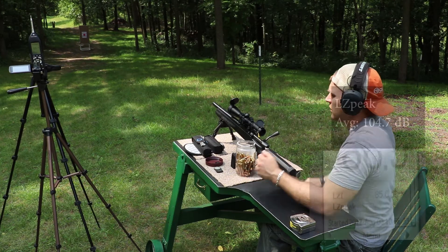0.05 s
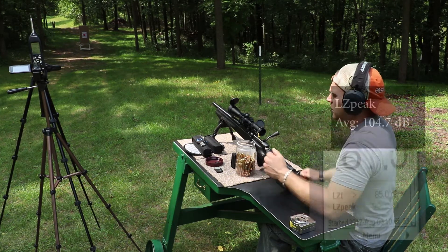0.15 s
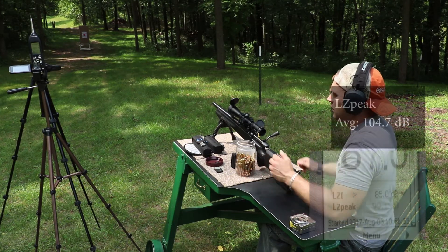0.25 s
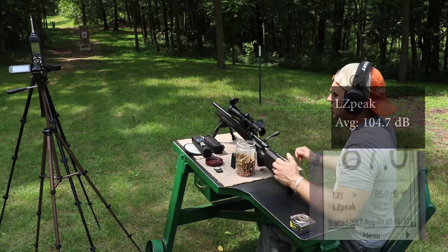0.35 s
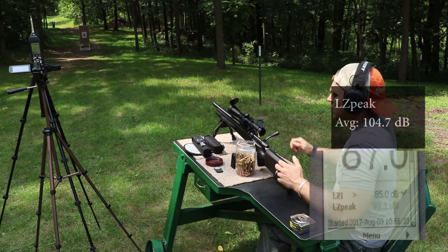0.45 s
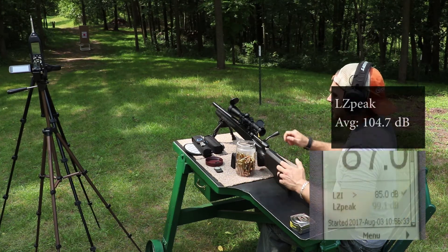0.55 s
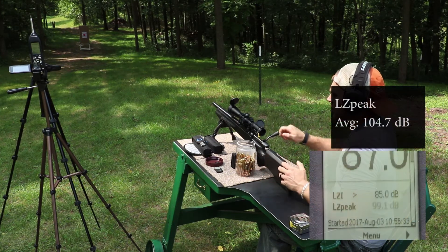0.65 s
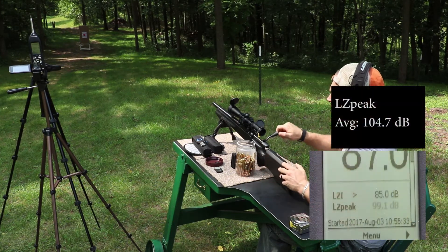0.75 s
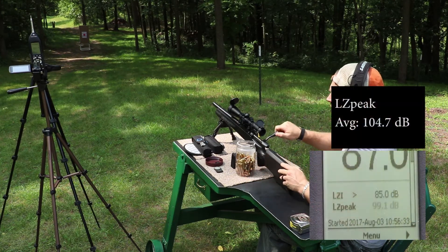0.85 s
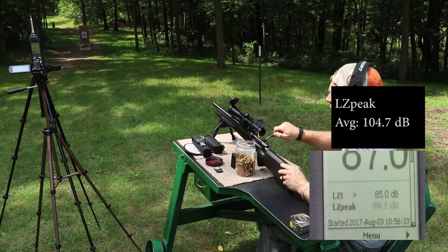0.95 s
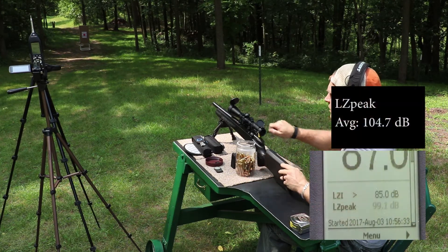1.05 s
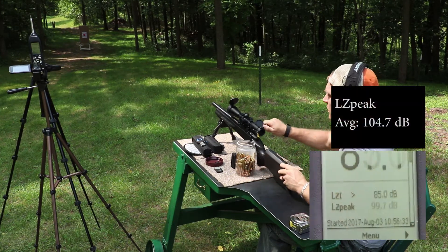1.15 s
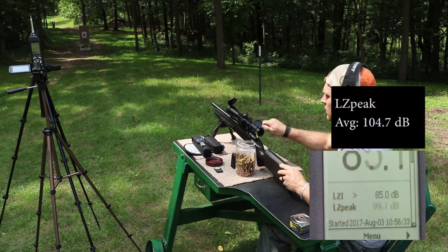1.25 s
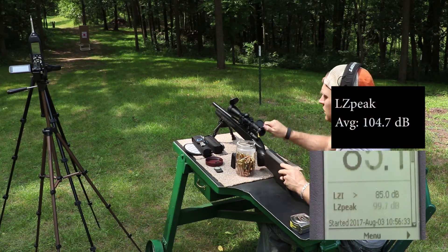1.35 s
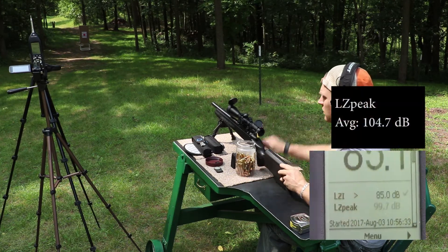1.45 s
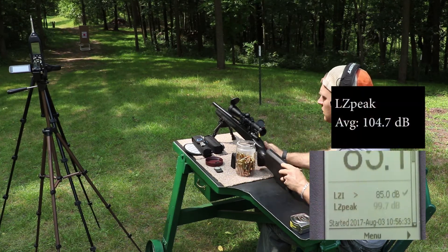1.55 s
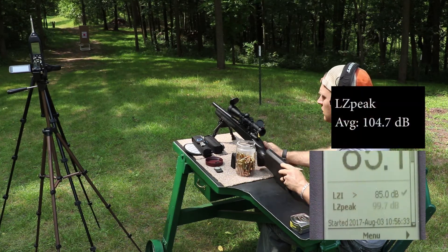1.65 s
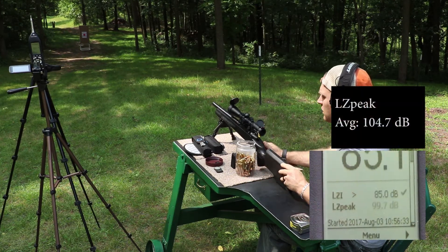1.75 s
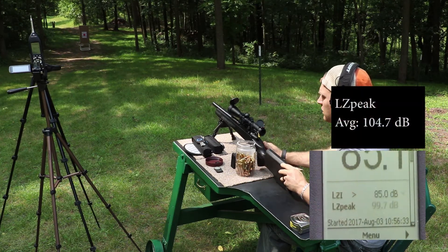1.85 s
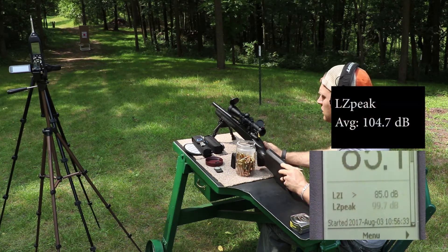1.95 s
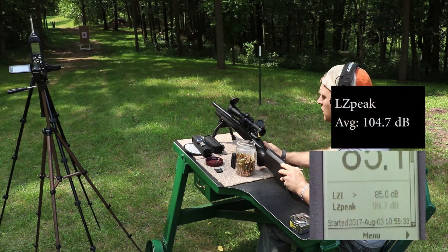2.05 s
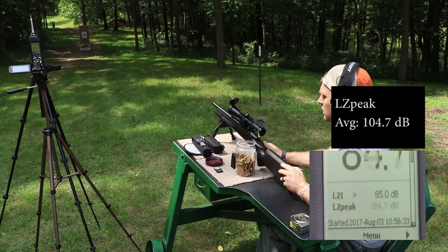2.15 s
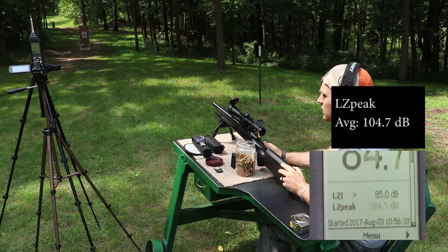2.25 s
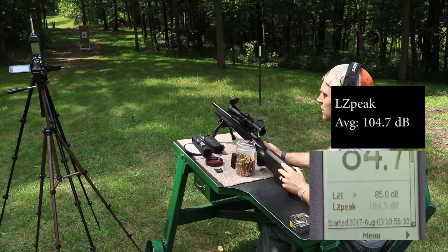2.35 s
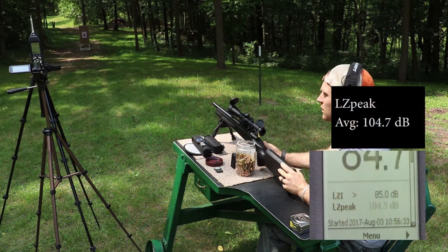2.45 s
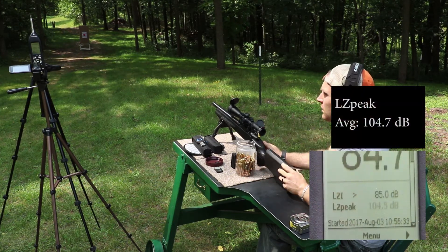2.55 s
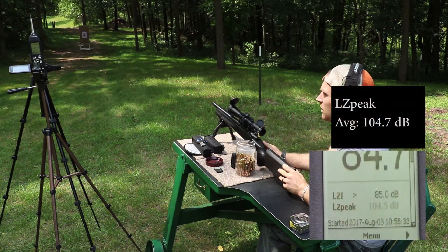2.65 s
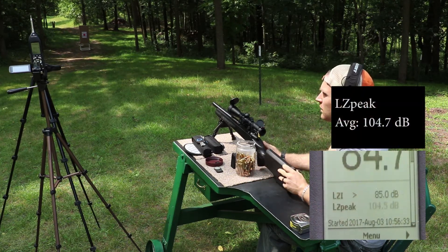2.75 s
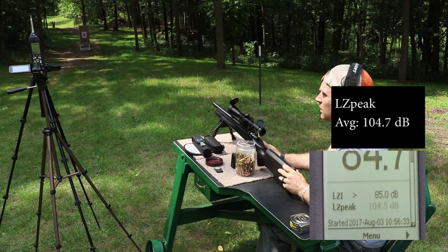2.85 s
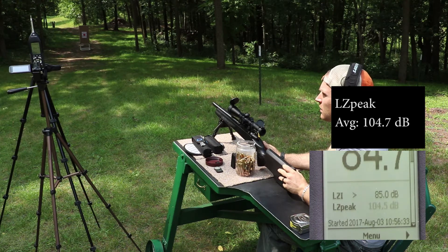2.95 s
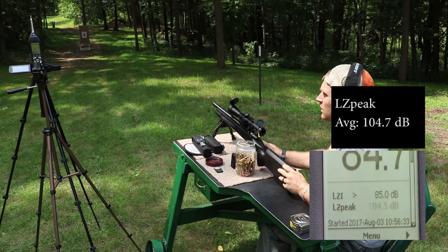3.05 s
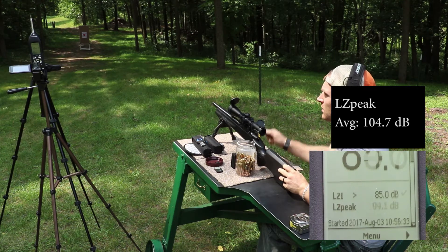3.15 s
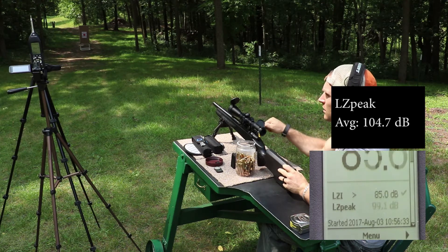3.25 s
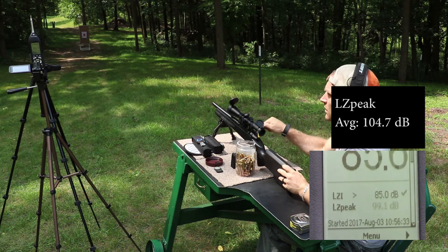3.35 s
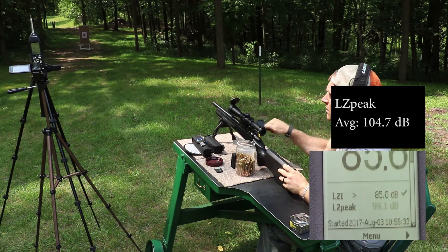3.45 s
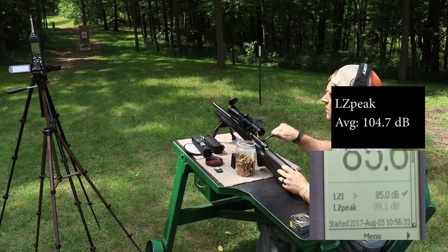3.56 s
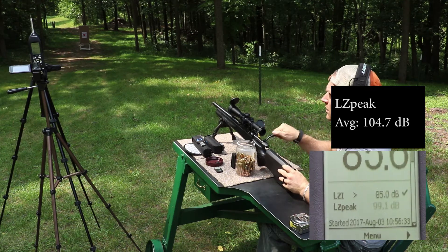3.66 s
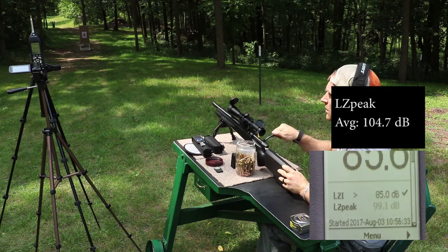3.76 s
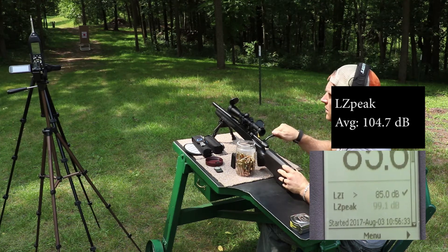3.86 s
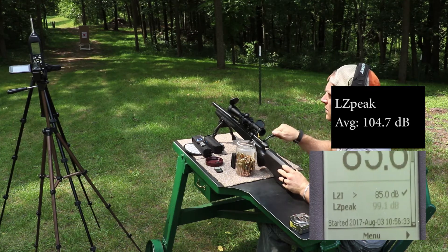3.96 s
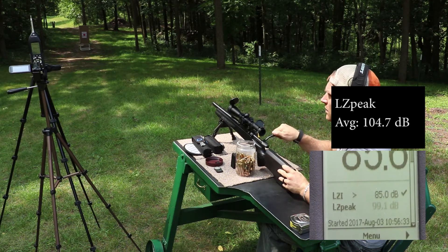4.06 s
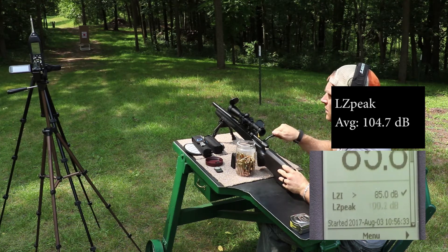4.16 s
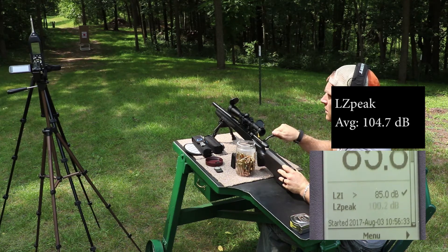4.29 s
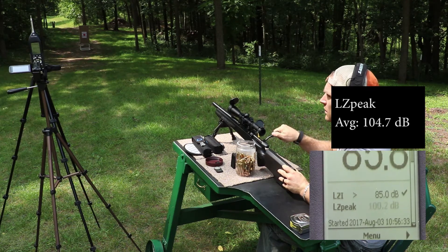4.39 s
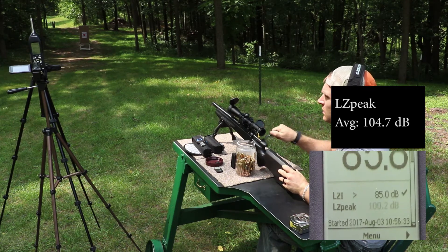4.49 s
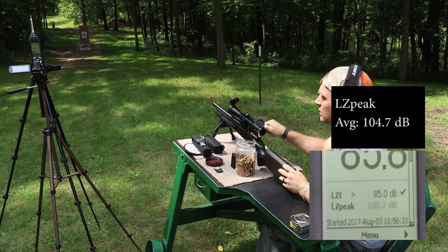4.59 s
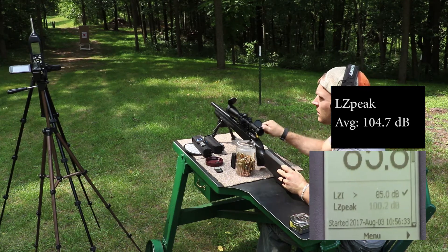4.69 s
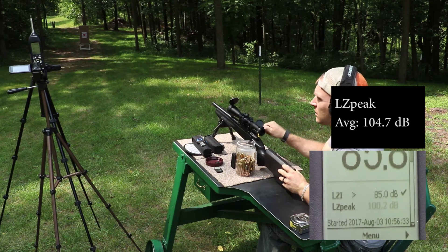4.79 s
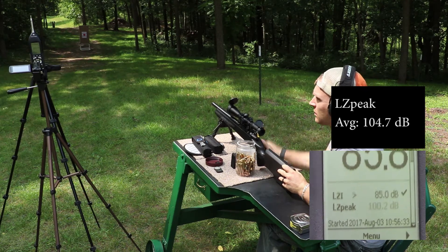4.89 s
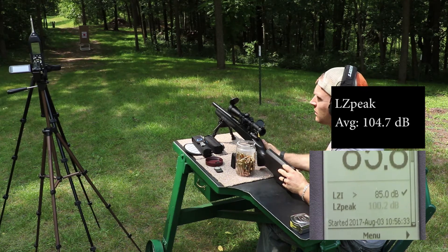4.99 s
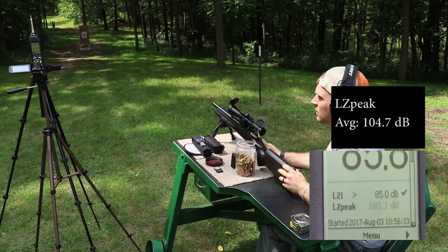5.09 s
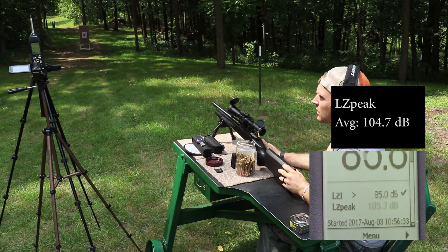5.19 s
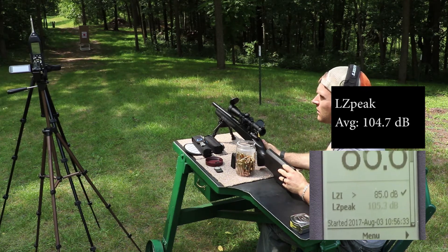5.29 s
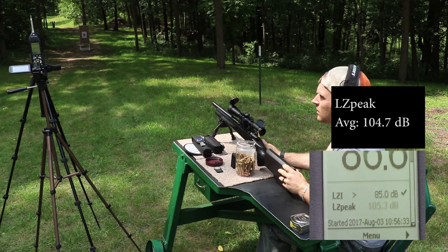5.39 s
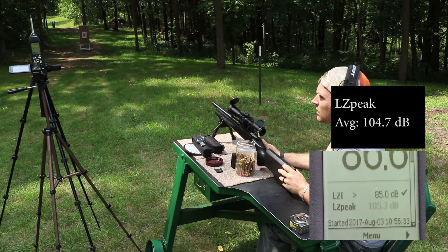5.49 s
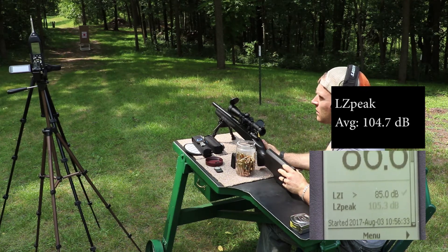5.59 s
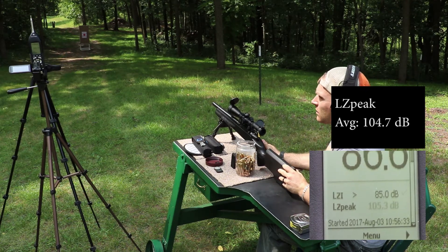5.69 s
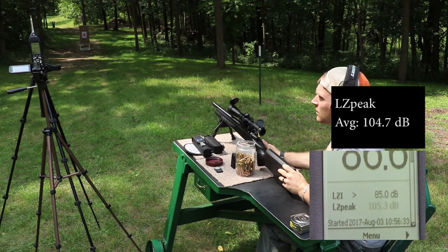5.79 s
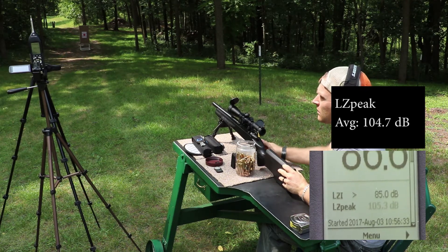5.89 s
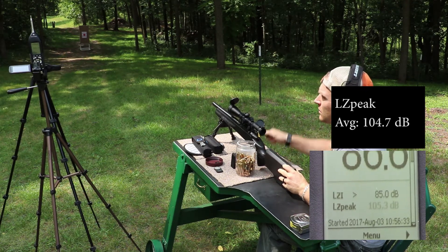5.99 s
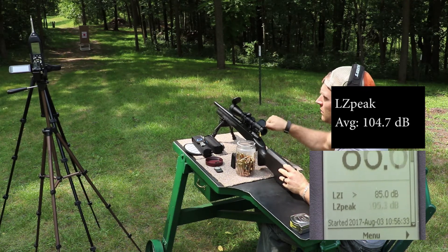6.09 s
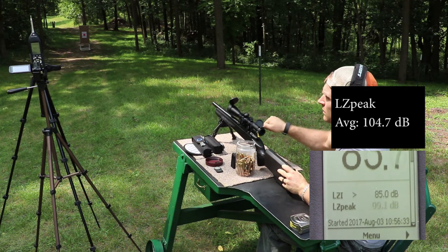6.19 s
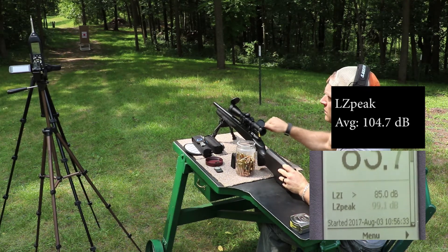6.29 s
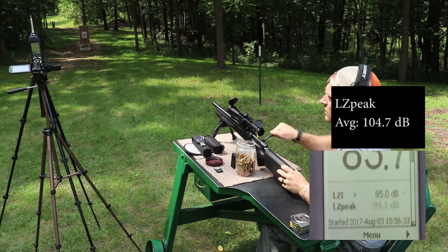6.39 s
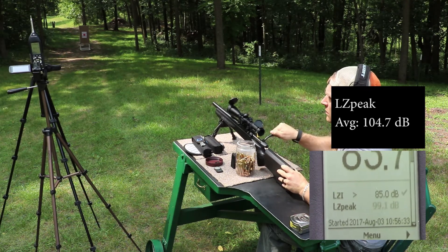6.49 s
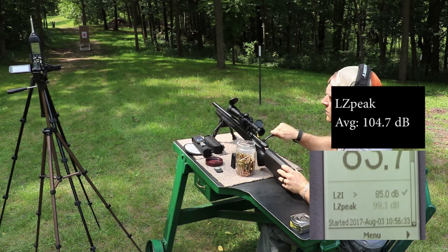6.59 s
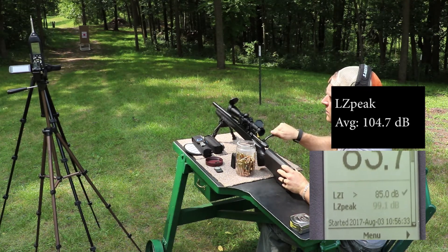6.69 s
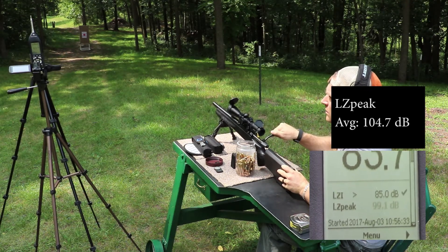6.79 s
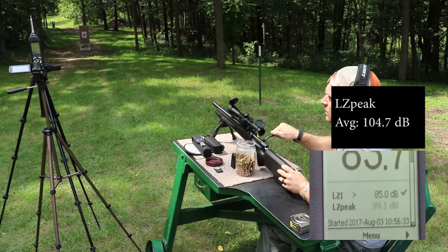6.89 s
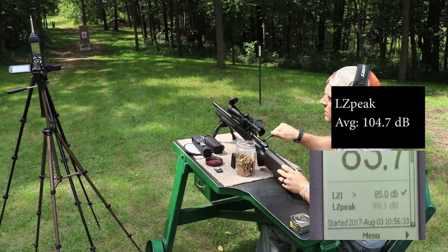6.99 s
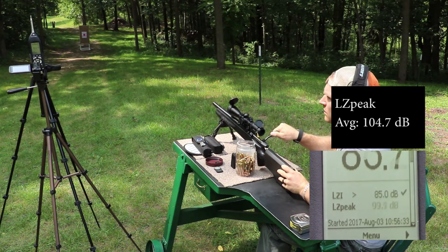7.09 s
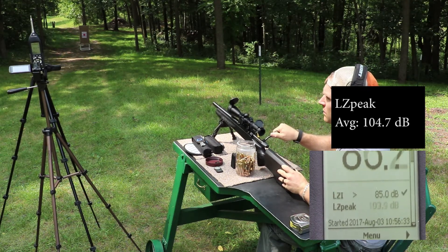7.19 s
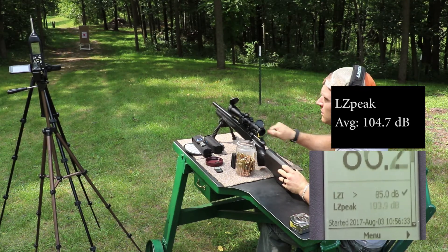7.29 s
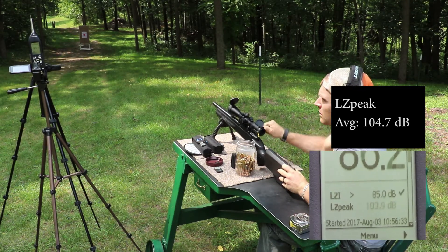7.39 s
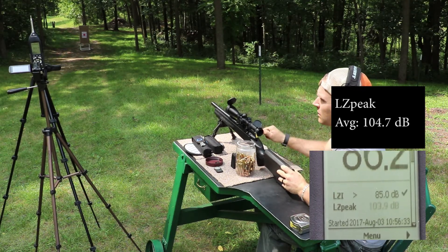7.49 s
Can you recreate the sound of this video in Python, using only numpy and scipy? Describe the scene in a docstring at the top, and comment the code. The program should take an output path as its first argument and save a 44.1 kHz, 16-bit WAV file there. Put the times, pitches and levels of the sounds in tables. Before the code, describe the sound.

Crisp steel clicks, short scrapes and hard clacks of a bolt-action rifle being cycled outdoors, over soft leaf hiss and high insect chirping.

```python
"""Forest clearing: a bolt-action rifle is cycled on a shooting bench while insects chirp in the grass.
The handle lifts, the bolt scrapes back to its stop, is shoved home and is locked down. Contacts are
noise bursts that ring the rifle's modes; slides are rubbing noise with a rising zip of ridges. Trees
scatter each clack into a late wash; breeze and chorus are shaped noise, insect songs are swept tones.
The recorder's limiter ducks on the loud blows, which still clip."""
import sys
import numpy as np
from scipy import signal
from scipy.fft import rfft, irfft, next_fast_len
from scipy.io import wavfile
from scipy.ndimage import uniform_filter1d, map_coordinates

SR = 44100
rng = np.random.default_rng(int(sys.argv[2]) if len(sys.argv) > 2 else 0)


def persist_wave(psi):
    """Save psi, clipped to +-1, as 16-bit WAV."""
    counts = np.round(np.clip(psi, -1, 1) * 32767).astype(np.int16)
    wavfile.write(sys.argv[1], SR, np.atleast_2d(counts).T)


N = 332514  # samples

# In every contact table, treble is the gain of a shelf above about 4 kHz, set before the blow is levelled.
# bolt pulled back against its stop: (time [s], level [dB], chatter [s], treble [dB])
BACK_STOPS = [(3.6157, 24, 0.002, 0), (6.4607, 25.5, 0.0029, 0.5)]
# handle turned down into the stock: (time [s], level [dB], chatter [s], treble [dB])
LOCKINGS = [(1.536, 16, .0013, 3), (4.9631, 15.5, .0011, 3)]


def amp(db):
    """Level to amplitude: 20 dB is a factor of ten."""
    return 10 ** (np.asarray(db) / 20)


def unit(x):
    """Normalization: x at rms 1."""
    return x / np.sqrt(np.mean(x ** 2) + 1e-20)


def along(points, hz):
    """Interpolation of (frequency [Hz], value) points on a logarithmic frequency axis."""
    f, v = np.transpose(points)
    return np.interp(np.log(hz + 1), np.log(f + 1), v)


def wobble(rate, size):
    """Band-limited fluctuation: a smooth random curve with rate knots a second."""
    knots = rng.standard_normal(int(size * rate / SR) + 4)
    return map_coordinates(knots, [np.arange(size) * rate / SR])


def add(track, s, sound):
    """Superposition: mix a sound into the track at time s [s]."""
    part = track[max(0, round(s * SR)):][:len(sound)]
    part += sound[:len(part)]


def filtered(x, response):
    """Linear filtering: the spectrum of x times a response of frequency."""
    n = x.shape[-1]
    padded = next_fast_len(n + SR // 10)
    return irfft(rfft(x, padded) * response(np.fft.rfftfreq(padded, 1 / SR)), padded)[..., :n]


def causal(gain):
    """Minimum phase: folding the cepstrum gives the causal response with this gain."""
    cepstrum = irfft(np.log(np.maximum(gain, 1e-6)))
    half = len(cepstrum) // 2
    cepstrum[1:half] *= 2
    cepstrum[half + 1:] = 0
    return np.exp(rfft(cepstrum))


def rush(spectrum, patchy_db):
    """Partial coherence: patchy stereo noise of rms 1 whose channels differ more in the treble."""
    # likeness of left and right: (frequency [Hz], correlation)
    likeness = [(60, 0.77), (150, 0.76), (380, 0.69), (950, 0.75), (2380, 0.61), (5980, 0.34),
                (15000, 0.06)]
    z = signal.stft(rng.standard_normal((2, N)), nperseg=512)[2]
    patches = uniform_filter1d(rng.standard_normal(z.shape[1:]), size=5, axis=0)  # over frequency
    patches = uniform_filter1d(patches, size=14, axis=1)  # over time
    pair = signal.istft(z * amp(patchy_db * unit(patches)), nperseg=512)[1][:, :N]

    def mid_side(hz):
        angle = np.arccos(np.clip(along(likeness, hz), -1, 1)) / 2
        return amp(along(spectrum, hz)) * [np.cos(angle), np.sin(angle)]

    mid, side = filtered(pair, mid_side)
    return unit(np.array([mid + side, mid - side]))


def breeze():
    """Broadband flow noise: leaves hiss steadily over a low outdoor rumble that swells and sinks."""
    # spectral shape of the air: (frequency [Hz], relative density [dB per Hz])
    leaves = [(20, -10), (45, -1.5), (70, -5), (110, -0.5), (200, -9), (400, -12.5), (800, -16.5),
              (1600, -21), (3200, -25.5), (5000, -27), (6000, -29.5), (10000, -35.5), (16000, -38.5)]
    # course of the rumble: (time [s], relative level [dB])
    rumble = [(0.0, -48.5), (1.44, -51), (1.57, -49.5), (4.82, -49), (5.04, -47.5), (7.3, -49.5)]
    rumble_db = np.interp(np.arange(N) / SR, *np.transpose(rumble))
    air = rush(leaves, patchy_db=1)
    low = filtered(air, lambda hz: 1 / (1 + (hz / 220) ** 4))
    return amp(-44.0) * (air - low) + amp(rumble_db + 2.0) * unit(low)


def insects(sweep_hz=650, bend_hz=280):
    """Stridulation: each wing stroke is an arch of pitch; far singers blur to a chorus of noise."""
    # songs: (start [s], end [s], mean chirp rate [per s], nominal top pitch [Hz], level [dB])
    songs = [(0, 0.74, 16.7, 7290, -58), (.3, 1.5, 8.4, 7600, -67), (1.702, 5.3, 17.8, 8780, -67),
             (1.7, 7, 11.4, 7380, -63), (5.046, 8.7, 16.4, 7350, -56.5), (6.749, 7.35, 13, 8600, -76)]
    # spectral shape of the far chorus: (frequency [Hz], relative density [dB per Hz])
    chorus_shape = [(5500, -41), (6400, -11), (7100, -1), (7800, 1.5), (8300, -4.5), (9200, -19),
                    (11000, -56)]
    track = np.zeros(N)
    for start, end, rate, top_hz, db in songs:
        n = round((end - start) * SR)
        stroke = np.cumsum(rate * (1 + .025 * wobble(5, n))) / SR % 1  # position within the stroke, 0 to 1
        arch = 2 * (stroke - .4)
        pitch = top_hz - bend_hz * np.linspace(-1, 1, n) ** 2  # the song climbs to its middle, then sinks
        pitch = pitch - sweep_hz * 2 * arch ** 2 + 50 * wobble(700, n)
        pressure = np.sin(np.pi * stroke) ** 2 * amp(-7 * abs(arch) + 2.5 * wobble(200, n))
        chirps = unit(pressure * np.sin(2 * np.pi * np.cumsum(pitch) / SR))
        add(track, start, amp(db) * chirps * signal.windows.tukey(n, .1))
    chorus = rush(chorus_shape, patchy_db=1)
    return track + amp(-57.5 + wobble(35, N)) * chorus


def forest(x, first_s=0.03, rise_s=0.042, t60=0.67, size=256):
    """Diffuse scattering: trunks and foliage return the energy late, as two unrelated channels."""
    # gain of the returned sound: (frequency [Hz], relative gain [dB])
    echo_colour = [(150, -24.5), (600, -7.5), (1100, -11), (1600, -1), (2500, -1.5), (5000, -4),
                   (9000, -8.5), (12000, -17), (15000, -14.5)]
    hz, t, z = signal.stft(x, SR, nperseg=size)
    late = np.maximum(t[t < 1] - first_s, 0)
    shape = ((1 - np.exp(-late / rise_s)) * amp(-60 * late / t60)) ** 2
    power = uniform_filter1d(abs(z) ** 2, size=5, axis=0)
    power = signal.fftconvolve(power, shape[None] / shape.sum(), axes=1)[:, :len(t)]
    grain = signal.stft(rng.standard_normal((2, N)), nperseg=size)[2]
    wash = grain / grain.std() * np.sqrt(abs(power)) * amp(along(echo_colour, hz))[:, None]
    return signal.istft(wash, nperseg=size)[1][:, :N]


def rifle(hz, scatter_db=1.0):
    """Modal superposition: stock and receiver resonances, excited a little differently each time."""
    # stock and receiver modes: (frequency [Hz], width [Hz], mean level [dB])
    modes = [(238, 108, -0.5), (311.6, 22.4, 13), (547, 192, 4), (789, 79, 6.5), (916, 57, 4.5),
             (1182, 133, 4), (1398, 132, 4), (1603, 37, -3.5), (2310, 69, 5.5), (2900, 37, -2.5),
             (3600, 55, 7), (4390, 123, 7.5), (5420, 660, -3), (6340, 100, -1), (6690, 94, 7.5),
             (10030, 185, 13.5), (11780, 210, 14)]
    response = 0
    for k, (centre, width, db) in enumerate(modes):
        gain = (-1) ** k * amp(db + scatter_db * rng.standard_normal())  # neighbours alternate in sign
        response = response + gain * 1j * hz * width / (centre ** 2 - hz ** 2 + 1j * hz * width)
    return response


def blows(table, tone, crack_t60, tail_db, tail_t60, ring_db, rise_db=-22, size=8192):
    """Impact excitation: a brief rise leads into a chattering crack of dense, short modes over the ring."""
    rise_s = .003  # short noise rise before the blow [s]
    track, t, hz = np.zeros(N), np.arange(size) / SR - rise_s, np.fft.rfftfreq(size, 1 / SR)
    dense = causal(hz ** 2 / (hz ** 2 + 1500 ** 2))  # modes crowd together only in the treble
    for s, db, chatter, treble_db in table:
        free = np.maximum(t - chatter, 0)  # time since the parts came to rest [s]
        decay = amp(-60 * free / crack_t60) + amp(tail_db - 60 * free / tail_t60)
        rise = amp(rise_db + 20 * np.minimum(t, 0) / rise_s)
        crack = rfft(rng.standard_normal(size) * np.where(t < 0, rise, decay))
        crack /= np.sqrt(uniform_filter1d(abs(crack) ** 2, size=160))  # a sharp contact feeds every band alike
        ring = amp(ring_db) * rifle(hz) * np.exp(-2j * np.pi * hz * rise_s)
        shelf_db = treble_db / (1 + (4000 / (hz + 1)) ** 4)
        colour = causal(amp(along(tone, hz) + shelf_db))
        blow = irfft((crack * dense + ring) * colour)
        add(track, s - rise_s, amp(db) * blow / np.linalg.norm(blow))  # level sets the blow's energy
    return track


def rocking():
    """Soft impact: the stock rocks on its bipod, a contact with little treble."""
    # rocks: (time [s], level [dB], chatter [s], treble [dB])
    rocks = [(1.484, -12.5, .002, -5), (1.567, -5, 0.0067, 3), (4.972, -4, .003, 6), (7.432, 2, .001, 0)]
    # colour of the soft contact: (frequency [Hz], relative density [dB per Hz])
    tone = [(100, -1), (230, -0.5), (320, -1), (480, -2), (1000, -48), (4000, -71)]
    return blows(rocks, tone, crack_t60=0.013, tail_db=-12, tail_t60=.05, ring_db=-5)


def click(s, db):
    """Contact duration: a firmer light click settles sooner; gives (s, dB, chatter s, treble dB)."""
    chatter_at_0_db_s, halving_db, treble_db = 0.0017, 7.5, -1
    return s, db, chatter_at_0_db_s * 2 ** (-db / halving_db), treble_db


def opening():
    """Successive impacts: the handle snaps up and rebounds, the cam slips, the bolt frees and rattles."""
    # handle lifted: (time [s], level [dB], time to the top of the cocking cam [s])
    lifts = [(3.2572, 4.5, 0.036), (6.102, 7.5, 0.037)]
    # bolt pulled free of its seat: (time [s], level [dB])
    pulls = [(3.5157, -4), (6.3724, 1.5)]
    lift_chatter_s, lift_treble_db = 0.0015, 15  # a short, bright snap
    rebound_s, rebound_db = 0.0045, -10  # the handle bounces once
    cam_step_s, cam_chatter_s, cam_db, cam_treble_db = .0062, 0.0017, 5, 14
    cam_first_db = -11  # the first slip is weaker and duller by this
    drop_s, drop_db, drop_chatter_s, drop_treble_db = 0.0087, -4, 0.0086, -13  # onto the raceway
    rattle_lead_s, rattle_step_s, rattle_chatter_s = 0.011, 0.016, 0.0086
    rattle_db, rattle_grows_db, rattle_treble_db = -4, 1, -13  # last wobble; gain from one to the next; treble
    contacts = []
    for s, db, cam_s in lifts:
        contacts.append((s, db, lift_chatter_s, lift_treble_db))
        contacts.append((s + rebound_s, db + rebound_db, lift_chatter_s, lift_treble_db))
        for k, weak_db in enumerate([0, 0, cam_first_db]):  # three slips, counted back from the top
            slip_s = s + cam_s - k * cam_step_s
            contacts.append((slip_s, cam_db + weak_db, cam_chatter_s, cam_treble_db + weak_db))
    for s, db in pulls:
        contacts.append(click(s, db))
        contacts.append((s + drop_s, drop_db, drop_chatter_s, drop_treble_db))
    for stop, *_ in BACK_STOPS:
        for k in range(3):  # wobbles of the drawn bolt, counted back from the stop
            wobble_s = stop - rattle_lead_s - k * rattle_step_s
            contacts.append((wobble_s, rattle_db - k * rattle_grows_db, rattle_chatter_s, rattle_treble_db))
    return contacts


def light_contacts():
    """Weak impacts of steel: opening strokes, single clicks and the handle grazing its notch."""
    # single light clicks (taps, the bolt nudged forward, its lugs touching): (time [s], level [dB])
    clicks = [(0.056, -14), (1.066, -10), (1.462, -13.5), (1.482, 3.5), (3.151, -21.5), (4.5538, -5.5),
              (4.9083, -.5), (6.2134, -16), (6.239, -9), (6.3232, -11), (7.3032, -12), (7.5214, -7.5)]
    # colour of a light contact: (frequency [Hz], relative density [dB per Hz])
    tone = [(100, -25), (310, -7), (550, -5), (1000, 6), (1400, 7.5), (2350, 2.5), (5000, -10.5),
            (7000, -21.5), (12000, -35), (15500, -38)]
    graze_lead_s, graze_db, graze_chatter_s, graze_treble_db = .012, -4, 0.0033, -18
    grazes = [(s - graze_lead_s, graze_db, graze_chatter_s, graze_treble_db) for s, *_ in LOCKINGS]
    contacts = opening() + [click(s, db) for s, db in clicks] + grazes
    return blows(contacts, tone, crack_t60=0.016, tail_db=-14.0, tail_t60=0.079, ring_db=-4, rise_db=-6.5)


def slides(ring_db=-1, zip_db=-6, slow_hz=4500):
    """Sliding friction: the scrape brightens with speed; machining ridges add a zip of rising pitch."""
    # bolt sliding in its raceway: (start [s], end [s], nominal level at full speed [dB])
    strokes = [(1.068, 1.185, -32.5), (3.525, 3.615, -35), (4.549, 4.651, -32), (6.38, 6.468, -32),
               (7.333, 7.422, -33)]
    # colour of the scrape: (frequency [Hz], relative density [dB per Hz])
    scrape_tone = [(300, -12.5), (700, -5.5), (1250, -5), (2000, -5), (3500, -3.5), (5000, -5.5),
                   (7000, -3.5), (9000, -6), (12000, -13), (15500, -22)]
    swell_db = 5  # gain from rest to full speed
    ridge_hz = 3840  # reference ridge rate: the zip sweeps from 0.6 to 1.09 times this
    rub_hz = 6500  # rubbing hardly rings the modes above this
    rise_s = 0.0058  # time constant of the hand getting the bolt moving

    def rubbing(hz):
        ring = amp(ring_db) * rifle(hz) / (1 + (hz / rub_hz) ** 4)
        return amp(along(scrape_tone, hz)) * (1j + ring)

    track = np.zeros(N)
    for start, end, db in strokes:
        n = round((end - start) * SR)
        speed = np.sin(np.linspace(0, np.pi / 2, n)) ** 2  # 0 at rest, 1 at full speed
        grit = rng.standard_normal(n) * amp(3 * wobble(900, n))
        scrape = unit(filtered(grit, rubbing))
        jitter = 1 + .022 * wobble(1200, n) + .04 * wobble(70, n)
        phase = 2 * np.pi * np.cumsum(ridge_hz * (.6 + 0.49 * speed) * jitter) / SR
        ridges = .7 * np.sin(phase) + np.sin(2 * phase) + .25 * np.sin(3 * phase)
        ridges = ridges * amp(4 * wobble(250, n))
        fast = scrape + amp(zip_db) * unit(ridges)
        slow = filtered(fast, lambda hz: 1 / (1 + (hz / slow_hz) ** 2))
        grip_db = 1.2 * wobble(90, n)
        force = amp(db - swell_db * (1 - speed) + grip_db)
        rise = 1 - np.exp(-np.arange(n) / SR / rise_s)
        envelope = rise * force * signal.windows.tukey(n, .05)
        add(track, start, envelope * (speed * fast + (1 - speed) * slow))
    return track


def bolt_back():
    """Impact at a stop: the bolt, pulled back, excites the receiver and stock."""
    # colour of the stop: (frequency [Hz], relative density [dB per Hz])
    tone = [(100, -2), (310, -8.5), (500, -5), (800, 2.5), (1500, 7), (2100, -5), (5000, -13), (8000, -9),
            (11000, -13), (15000, -11)]
    return blows(BACK_STOPS, tone, crack_t60=0.015, tail_db=-24.5, tail_t60=0.074, ring_db=-3.5)


def handle_locked():
    """Damped impact: the handle turned down into the stock gives a short crack with little ring."""
    # colour of the locking: (frequency [Hz], relative density [dB per Hz])
    tone = [(100, -24), (200, 6.5), (310, 1.5), (650, 4.5), (1000, 0.5), (1400, 9.5), (2400, -11),
            (6000, -15), (10000, -26), (15000, -29)]
    return blows(LOCKINGS, tone, crack_t60=0.0057, tail_db=-14, tail_t60=0.036, ring_db=-8.5, rise_db=-49)


def bolt_home():
    """Hard impact: the bolt shoved home gives the strongest broadband crack over the modes."""
    # bolt shoved home: (time [s], level [dB], chatter [s], treble [dB])
    shoves = [(1.1743, 25.5, .0045, -2.5), (4.6493, 26, 0.0038, -3.5), (7.4291, 28, 0.0032, -6)]
    # colour of the shove: (frequency [Hz], relative density [dB per Hz])
    tone = [(100, -13), (310, -19.5), (600, -18.5), (900, -6.5), (1250, 4.5), (1900, -1.5), (3400, -8.5),
            (5600, 0), (8000, -5.5), (11000, -5), (15000, -13)]
    return blows(shoves, tone, crack_t60=0.0074, tail_db=-17.5, tail_t60=0.044, ring_db=-3.0)


def scene():
    """Superposition of direct and diffuse fields: the rifle straight ahead, the clearing all round."""
    gun = rocking() + light_contacts() + slides() + bolt_back() + handle_locked() + bolt_home()
    ahead, aside = forest(gun)
    echo = amp(-24.5) * ahead + amp(-30.5) * np.array([aside, -aside])
    # the two microphone ports differ more as the wavelength shrinks: (frequency [Hz], level [dB])
    port_difference = [(300, -26), (1500, -24), (5000, -16), (9000, -14), (13000, -9)]
    side = filtered(gun, lambda hz: 1j * amp(along(port_difference, hz)))
    return breeze() + insects() + echo + np.array([gun + side, gun - side])


def record(dry, ceiling_db=3.0, release_db_per_s=130):
    """Gain reduction: a limiter ducks at once and recovers steadily; peaks still past 0.95 clip."""
    top_hz = 16100  # upper limit of the recorder's band
    over = np.maximum(20 * np.log10(np.abs(dry).max(axis=0) + 1e-9) - ceiling_db, 0)
    recovery = release_db_per_s * np.arange(N) / SR
    duck_db = uniform_filter1d(np.maximum.accumulate(over + recovery) - recovery, size=16)
    clipped = np.clip(dry * amp(-duck_db), -.95, .95)
    return filtered(clipped, lambda hz: 1 / (1 + (hz / top_hz) ** 80))


dry = scene()
out = record(dry)
persist_wave(out)
```